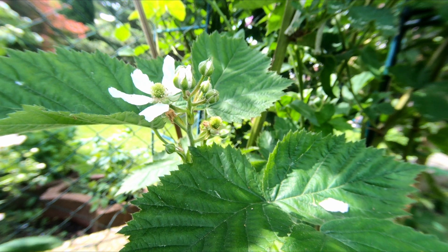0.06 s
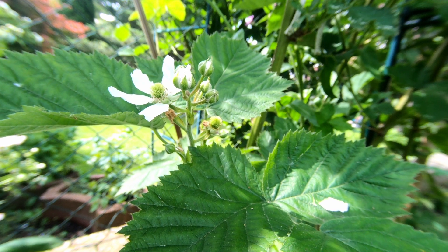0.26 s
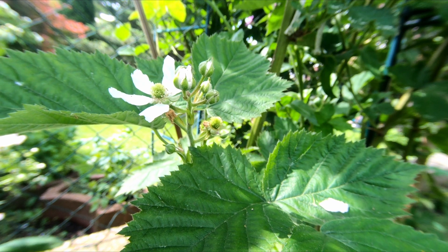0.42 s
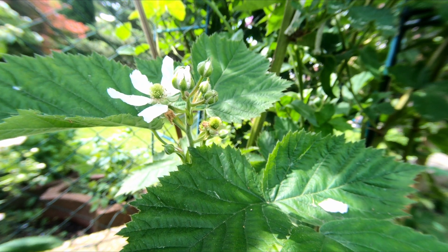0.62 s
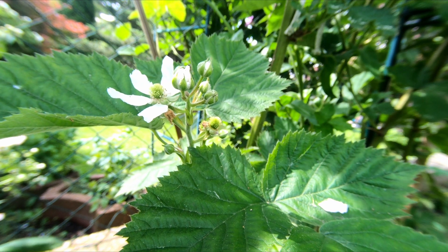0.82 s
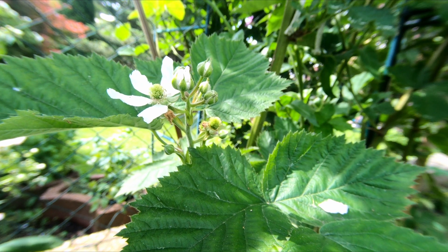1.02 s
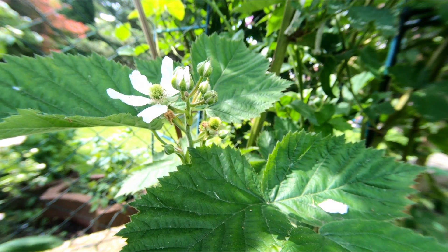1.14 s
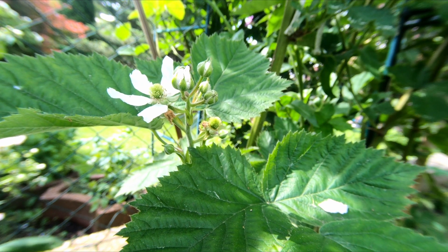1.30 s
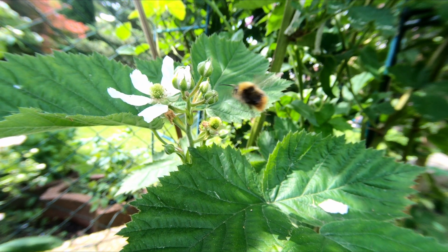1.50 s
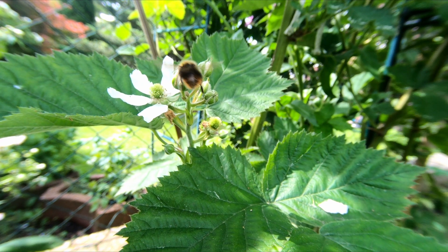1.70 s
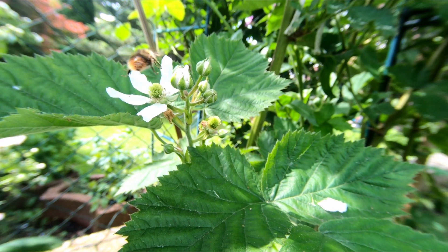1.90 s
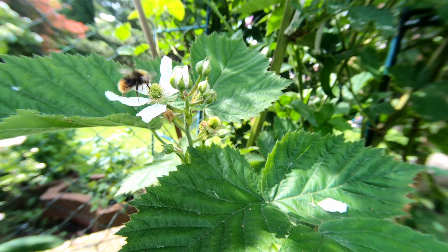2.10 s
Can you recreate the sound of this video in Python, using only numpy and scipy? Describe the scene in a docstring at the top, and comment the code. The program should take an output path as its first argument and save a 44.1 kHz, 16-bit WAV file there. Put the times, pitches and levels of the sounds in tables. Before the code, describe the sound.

A bumblebee buzzes in a garden. At first it is barely audible under light wind rumbling on the microphone, soft hiss and faint, distant bird whistles that end by 0.8 seconds. The nasal buzz swells around 1 second and is loudest near 1.2 seconds, wavering and shifting between left and right as it passes close. From 1.4 seconds it hovers more softly until just past 2 seconds, while the wind eases.

```python
"""In a garden, a bumblebee comes in over the leaves, brushes past the two microphone ports and
hovers at a flower. Each wingbeat gives a round hum, nasal overtones, a buzzing edge and a puff of
rasping air; edge and rasp also bounce off the nearest leaves. Behind it: soft hiss, light wind
rumbling on the ports, other bees humming and a bird whistling far off."""
import sys
import numpy as np
from scipy import signal
from scipy.fft import rfft, irfft
from scipy.io import wavfile

SR = 44100
rng = np.random.default_rng(int(sys.argv[2]) if len(sys.argv) > 2 else 0)


def output_pcm(signal):
    """Save a mono or channel-first signal as 16-bit PCM at the path in sys.argv[1].

    Samples are clipped to [-1, 1] before scaling.
    """
    pcm = np.clip(np.atleast_2d(signal).T, -1, 1) * 32767
    wavfile.write(sys.argv[1], SR, np.round(pcm).astype(np.int16))


N = 94815

# wingbeat rate, dropping quickly as the bee passes the ports (time [s], rate [Hz])
WING_RATE = [(.6, 159.2), (.668, 164.6), (.76, 185.8), (.814, 171), (.9, 163.3), (.93, 166.7),
             (.958, 198.5), (1.05, 196.1), (1.1, 188.6), (1.152, 198.3), (1.195, 198.7), (1.216, 183),
             (1.26, 185.4), (1.324, 180.7), (1.354, 193), (1.402, 191.1), (1.472, 177.8), (1.566, 195.5),
             (1.682, 181.5), (1.722, 197.3), (1.804, 185.1), (1.876, 191.7), (1.994, 179), (2.032, 193.2),
             (2.088, 197.3), (2.13, 178)]
# layer faders as the bee nears and turns
# (time [s], fundamental [dB], octave [dB], overtones [dB], edge and rasp [dB])
BEE_FADERS = [(0, -71.5, -82.5, -72.5, -74.5), (.6, -75, -75.5, -76.5, -85), (.76, -67, -65.5, -69, -80.5),
              (.9, -60.5, -62, -79, -81), (.96, -56.5, -56.5, -59.5, -69), (1.05, -42.5, -43, -52.5, -57.5),
              (1.11, -36.5, -42.5, -48, -60), (1.155, -32, -35, -40.5, -56),
              (1.19, -33.5, -35.5, -38.5, -54), (1.22, -33, -37.5, -44, -62.5),
              (1.26, -39.5, -40, -43, -60.5), (1.32, -54.5, -50, -48, -70), (1.38, -43, -43.5, -48, -68),
              (1.49, -55.5, -53, -55, -71.5), (1.56, -57.5, -48.5, -50.5, -65.5),
              (1.61, -48.5, -57, -57.5, -70.5), (1.73, -44, -54, -52.5, -67.5),
              (1.82, -46.5, -57.5, -60.5, -68), (1.88, -48, -58, -57.5, -63.5),
              (1.96, -47.5, -57.5, -60.5, -65), (2.01, -57.5, -62, -58, -70), (2.09, -49, -60, -58.5, -69),
              (2.15, -53, -68, -74, -69.5)]
# tone colour of edge and rasp (frequency [Hz], relative level [dB])
RASP_EQ = [(250, -21), (600, 1.5), (1200, 11.5), (2400, 9.5), (3300, 7), (4200, 2), (6000, 0), (7500, 1.5),
           (8200, -7.5), (10200, -5.5), (11500, -23), (14000, -25), (15000, -42)]
JITTER_PER_S = 59  # pace of the wingbeat's unevenness, in pitch and in level


def undb(db):
    """Decibels to gain."""
    return 10 ** (np.asarray(db) / 20)


def curve(table, axis=1):
    """A column of a time table, one value per sample."""
    rows = np.array(table, float)
    return np.interp(np.arange(N) / SR, rows[:, 0], rows[:, axis])


def colour(table, hz):
    """The dB of a spectrum at given frequencies."""
    rows = np.array(table, float)
    return np.interp(np.log(np.maximum(hz, 1)), np.log(rows[:, 0]), rows[:, 1])


def shaped(x, table):
    """Filter by a spectrum, keeping the power of white noise."""
    gain = undb(colour(table, np.fft.rfftfreq(N, 1 / SR)))
    return irfft(rfft(x) * gain / np.sqrt(np.mean(gain ** 2)), N)


def white():
    """Unrelated noise at the two ports."""
    return rng.standard_normal((2, N))


def walk(per_s):
    """Smooth random modulation with a spread of 1."""
    hz = np.fft.rfftfreq(N, 1 / SR)
    y = irfft(rfft(rng.standard_normal(N)) * np.exp(-(2 * hz / per_s) ** 2), N)
    return (y - y.mean()) / y.std()


def pan(db):
    """Left and right gains for a level difference, at constant power."""
    gains = undb(np.array([db, -db]) / 2)
    return gains / np.sqrt(np.mean(gains ** 2, axis=0))


def garden(level_db=-66, shared=0.15):
    """A wide bed of soft hiss, a little of it common to both ports."""
    # colour of the hiss (frequency [Hz], relative level [dB])
    hiss_eq = [(100, 0.5), (250, -1), (500, -5.5), (900, -4.5), (1400, -4.5), (2000, -7), (2800, -9.5),
               (4200, -23), (6000, -23), (7500, -22), (8200, -25.5), (10000, -25), (11500, -38.5),
               (14000, -39.5), (15000, -49)]
    air = np.sqrt(shared) * rng.standard_normal(N) + np.sqrt(1 - shared) * white()
    return shaped(air, hiss_eq) * undb(level_db)


def wind(buffet_db=-45, strong_gust_db=-40, buffet_growth=3.3):
    """Wind rumbles on each port; the stronger gusts buffet higher up."""
    # gusts on the ports (time [s], level [dB])
    gusts = [(0, -52), (.18, -52), (.25, -44), (.35, -39), (.43, -51.5), (.54, -43), (.66, -42.5),
             (.73, -40.5), (.82, -45), (.96, -37), (1.05, -42), (1.2, -48), (1.29, -43), (1.45, -43.5),
             (1.53, -54), (1.6, -66), (1.75, -52.5), (1.9, -57), (2.05, -61), (2.15, -51.5)]
    # colours of rumble and buffeting (frequency [Hz], relative level [dB])
    rumble_eq = [(15, 0.5), (30, -7), (48, 11), (65, -7.5), (88, -22.5), (120, -42.5), (250, -42.5),
                 (600, -79.5)]
    buffet_eq = [(30, -9.5), (60, 5), (80, 11), (115, -5.5), (200, -14.5), (400, -29.5), (1000, -89)]
    gust_db = curve(gusts)
    rumble = shaped(white(), rumble_eq) * undb(gust_db)
    buffet = shaped(white(), buffet_eq) * undb(buffet_db + buffet_growth * (gust_db - strong_gust_db))
    return rumble + buffet


def far_bees(wander=.04, db_per_octave=-3.5):
    """Faint wandering hums from wings elsewhere in the bush."""
    # one row a bee (wingbeat [Hz], fundamental level [dB])
    bees = [(199.3, -69), (180.6, -68.5)]
    out = 0
    for hz, db in bees:
        stroke = 2 * np.pi * np.cumsum(hz * (1 + wander * walk(per_s=13.16))) / SR
        for k in range(1, 8):
            gain = undb(db + db_per_octave * np.log2(k) + 2.2 * walk(per_s=36))
            out += gain * np.cos(k * stroke + rng.uniform(0, np.pi, (2, 1)))
    return out


def bird(waver=0.012):
    """Thin falling whistles, far away."""
    # notes (start [s], length [s], start pitch [Hz], end pitch [Hz], level [dB])
    whistles = [(.01, 0.21, 2570, 2550, -67.5), (0.155, 0.13, 2800, 2706, -71),
                (0.248, 0.092, 2460, 2270, -74), (0.485, 0.085, 2840, 2670, -79),
                (.59, 0.11, 2470, 2390, -75), (0.746, 0.04, 3120, 3050, -70)]
    t, out = np.arange(N) / SR, 0
    for start, length, from_hz, to_hz, db in whistles:
        progress = np.clip((t - start) / length, 0, 1)
        hz = (from_hz + (to_hz - from_hz) * progress) * (1 + waver * walk(per_s=77))
        swell = undb(db) * np.sqrt(2) * np.sin(np.pi * progress)
        out += swell * np.sin(2 * np.pi * np.cumsum(hz) / SR + rng.uniform(0, np.pi, (2, 1)))
    return out


def wing_tone(stroke, lobe_db=4.5, lobe_octaves=0.12, flicker_db=2.5, drift_rad=0.67, shimmer_db=0.64):
    """The wings' round hum and nasal overtones; the overtones flicker as the body sways."""
    # angle between the ports as seen from the bee (time [s], angle [rad])
    port_angle = [(0, 0.85), (.85, 1.27), (1.0, 2.15), (1.2, 1.5), (1.3, 2.53), (1.48, 1.7), (1.65, 0.722),
                  (1.85, 0.67), (2.15, 0.78)]
    # which port the wings face, left minus right
    # (time [s], fundamental [dB], octave [dB], overtones [dB])
    facing = [(.9, 6, 1, 6), (1.1, 3.5, 3, -6.5), (1.18, 1, -7.5, 0), (1.25, -7, -16, -13),
              (1.29, -5, 0, 1), (1.33, 11, 9, 0), (1.4, -2, 8, 7.5), (1.48, 4, -0.5, 5),
              (1.54, 4, -10, -2.5), (1.6, -3.5, -4, 0.5), (1.72, 1.5, 10, 6.5), (1.85, 2, 3, 5.5),
              (1.96, 6, 6, 30), (2.08, 8, -1, 5)]
    # nasal colour of the overtones (frequency [Hz], gain [dB])
    overtone_eq = [(570, -7), (770, -9), (960, -8), (1180, -11.5), (1370, -18), (1480, -19.5), (1600, -15),
                   (1900, -30.5), (2200, -20.5), (2500, -31.5), (3000, -42)]
    # a peak in the overtones that shifts as the bee turns (time [s], centre [Hz])
    lobe_centre = [(.95, 990), (1.08, 900), (1.18, 1010), (1.26, 740), (1.31, 1120), (1.38, 1137),
                   (1.5, 967.6), (1.6, 1003), (1.7, 746), (1.86, 761), (2.05, 902)]
    # the wings radiate in lobes, so the ports get different waves
    angle = curve(port_angle) * np.array([[-.5], [.5]])
    hum = undb(curve(BEE_FADERS, axis=1)) * pan(curve(facing, axis=1)) * np.cos(stroke + angle)
    hum += undb(curve(BEE_FADERS, axis=2)) * pan(curve(facing, axis=2)) * np.sin(2 * stroke - angle)
    hz, overtones = curve(WING_RATE), 0
    for k in range(3, 16):
        lobe = lobe_db * np.exp(-(np.log2(k * hz / curve(lobe_centre)) / lobe_octaves) ** 2)
        flicker = flicker_db * np.array([walk(per_s=26) for port in "LR"])
        drift = drift_rad * np.array([walk(per_s=42.4) for port in "LR"])
        gain = undb(colour(overtone_eq, k * hz) + lobe + flicker)
        overtones += gain * np.cos(k * stroke + angle + drift + rng.uniform(0, 2 * np.pi))
    overtones *= undb(curve(BEE_FADERS, axis=3)) * pan(curve(facing, axis=3))
    return np.sqrt(2) * (hum + overtones) * undb(shimmer_db * walk(JITTER_PER_S))


def wing_edge(stroke, trim_db=1, changes_per_s=28, uneven_db=5):
    """The sharp part of each stroke repeats from beat to beat: a buzz of harmonics trading strength."""
    position = np.arange(N) / SR * changes_per_s
    buzz, fundamental, harmonic = np.zeros((2, N)), np.exp(1j * stroke), 1
    for _ in range(79):
        harmonic = harmonic * fundamental  # next harmonic up
        strengths = undb(uneven_db * np.clip(rng.standard_normal(256), -2, 1.7))
        for port in range(2):
            phasors = strengths * np.exp(2j * np.pi * rng.random(len(strengths)))
            morph = np.interp(position + rng.random(), np.arange(len(phasors)), phasors)
            buzz[port] += (harmonic * morph).real
    return shaped(buzz / buzz.std(), RASP_EQ) * undb(curve(BEE_FADERS, axis=4) + trim_db)


def wing_rasp(stroke, trim_db=-5, sharpness=2.9):
    """A puff of air on each downstroke and another on the way back."""
    gate = np.exp(sharpness * np.cos(stroke)) + np.exp(-sharpness * np.cos(stroke))
    puffs = white() * gate / np.sqrt(np.mean(gate ** 2))
    return shaped(puffs, RASP_EQ) * undb(curve(BEE_FADERS, axis=4) + trim_db)


def among_leaves(x, echo_gain=0.74, delay_ms=1.5, sway_ms=0.21):
    """The treble changes as the bee turns, and a leaf echo with a moving delay combs it."""
    # treble rides (time [s], presence band [dB], top band [dB])
    brightness = [(0, 9.5, 7), (.9, 2, 11.5), (.97, 8, 10), (1.06, 0.5, 8), (1.115, 8, 6),
                  (1.18, -3.5, 7.5), (1.26, -0.5, 5.5), (1.4, 4.5, 8.5), (1.6, 3, -4.5), (1.8, -1.5, -26),
                  (2.15, -1, -38)]
    direct = x
    for column, band_hz in ((1, [2200, 3600]), (2, [7800, 20000])):
        band = signal.sosfiltfilt(signal.butter(2, band_hz, "bandpass", fs=SR, output="sos"), x)
        direct = direct + band * (undb(curve(brightness, axis=column)) - 1)
    n, echo = np.arange(N), np.zeros((2, N))
    for port in range(2):
        lag = (delay_ms + sway_ms * walk(per_s=3.2)) * SR / 1000
        echo[port] = np.interp(n - lag, n, direct[port])
    return (direct + echo_gain * echo) / np.hypot(1, echo_gain)


def swirls(stroke):
    """Air swirls off the wings at close range: short rough flares, chopped by the wingbeat."""
    # flares (peak time [s], half-width [s], centre [Hz], level [dB])
    flares = [(1.114, 0.0094, 2420, -57.5), (1.21, 0.0078, 1030, -51)]
    t, out = np.arange(N) / SR, 0
    for at, width, hz, db in flares:
        band = [(hz / 4, -60), (hz / 2, -18), (hz, 0), (hz * 2, -18), (hz * 4, -60)]
        chopped = white() * (1 + np.cos(stroke) / 2)
        out += shaped(chopped, band) * undb(db) * np.exp(-((t - at) / width) ** 2)
    return out


def bumblebee(jitter=0.0036):
    """One slightly uneven wingbeat drives tone, edge, rasp and swirls."""
    hz = curve(WING_RATE) * (1 + jitter * walk(JITTER_PER_S))
    stroke = 2 * np.pi * np.cumsum(hz) / SR
    return wing_tone(stroke) + among_leaves(wing_edge(stroke) + wing_rasp(stroke)) + swirls(stroke)


def scene():
    """The bee up close, the garden behind it."""
    return bumblebee() + far_bees() + bird() + garden() + wind()


def record(dry, top_hz=14900):
    """The ports colour the treble differently; the top is cut."""
    # port balance, the left brighter at the very top (frequency [Hz], left minus right [dB])
    port_balance = [(100, 0), (3000, 0), (5000, -2), (7000, -2), (8500, 4.5), (10000, 6.5), (14000, 7)]
    heard = irfft(rfft(dry) * pan(colour(port_balance, np.fft.rfftfreq(N, 1 / SR))), N)
    return signal.sosfilt(signal.ellip(8, .2, 70, top_hz, fs=SR, output="sos"), heard)


dry = scene()
out = record(dry)
output_pcm(out)
```